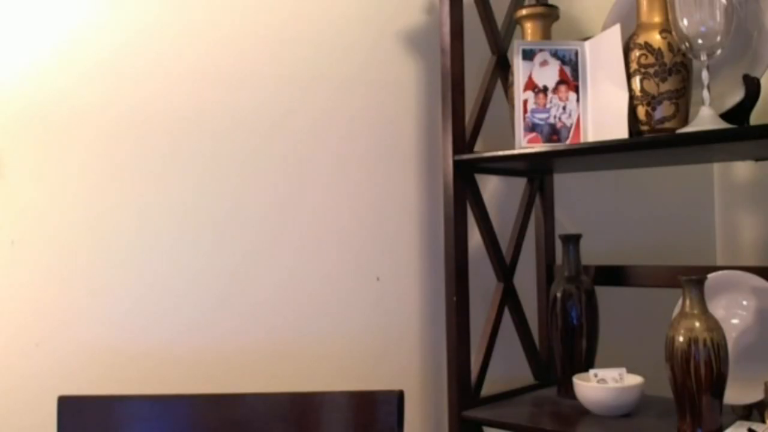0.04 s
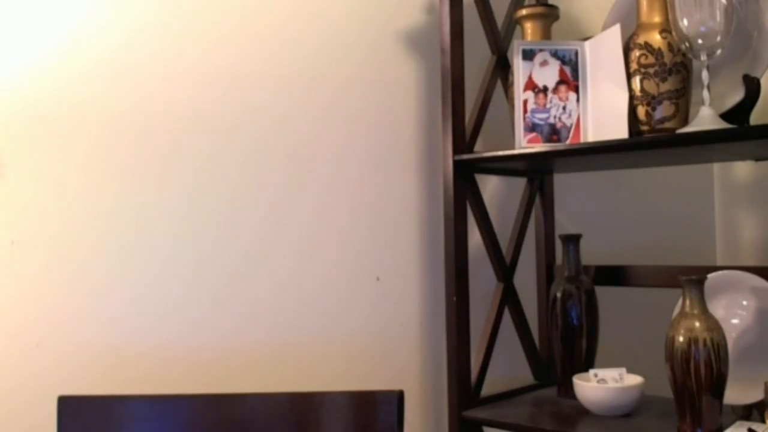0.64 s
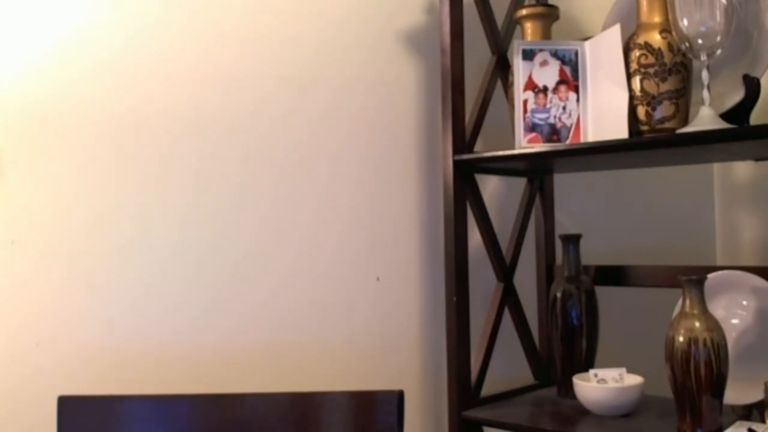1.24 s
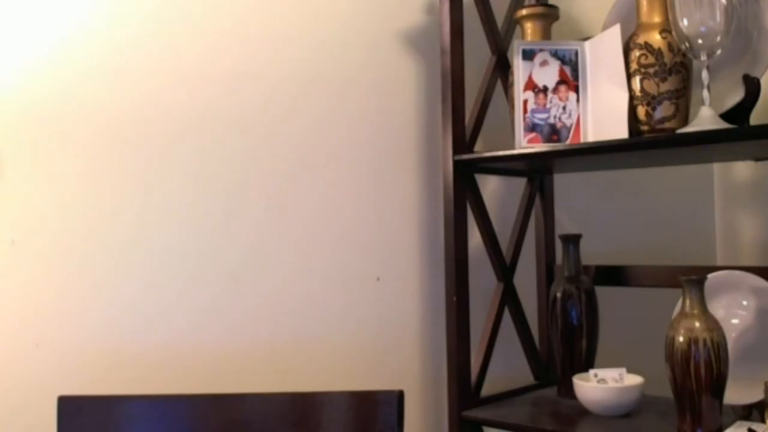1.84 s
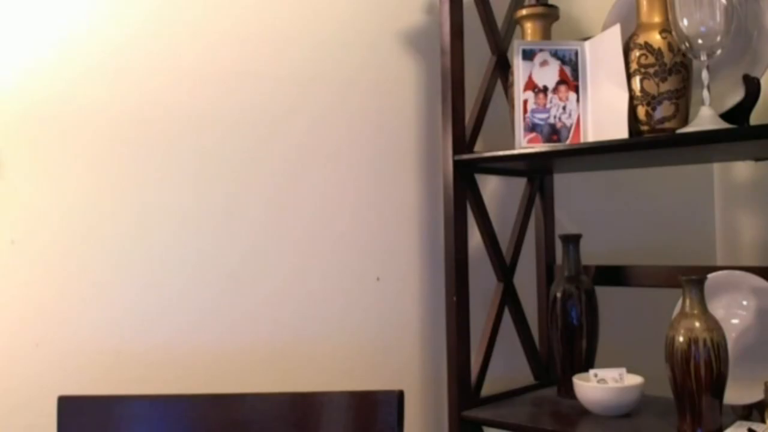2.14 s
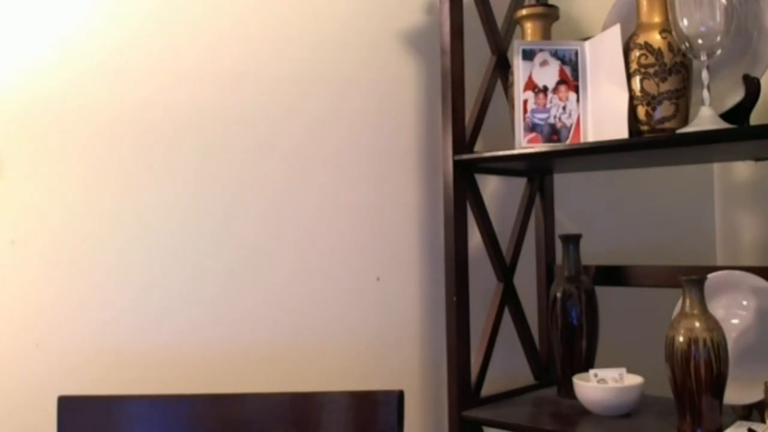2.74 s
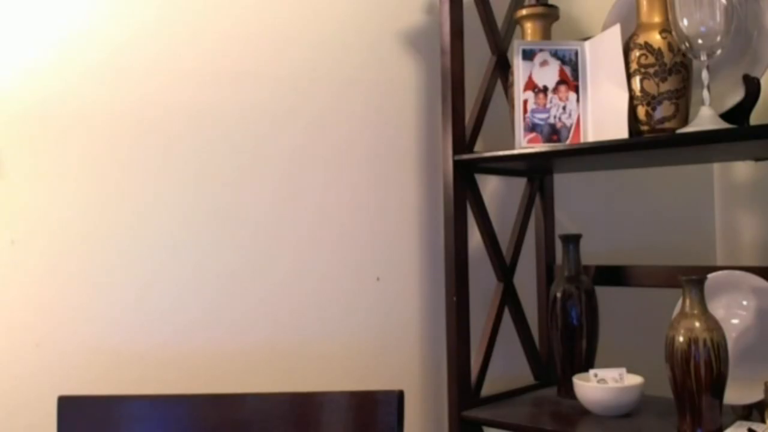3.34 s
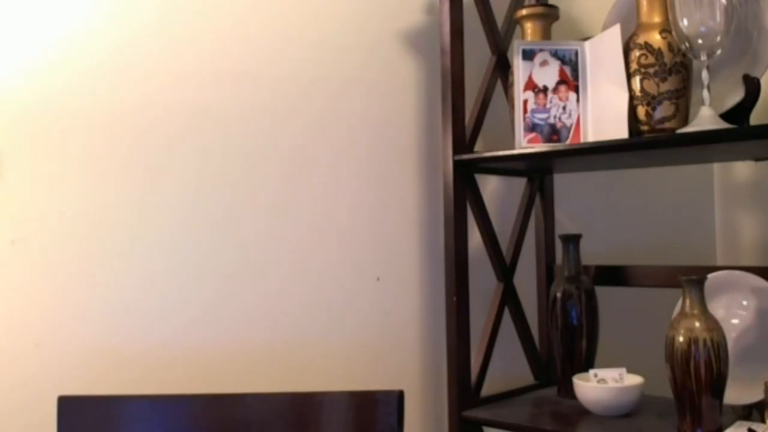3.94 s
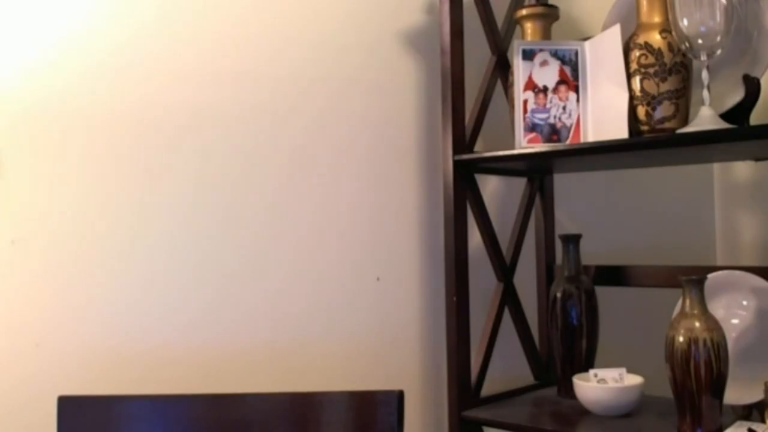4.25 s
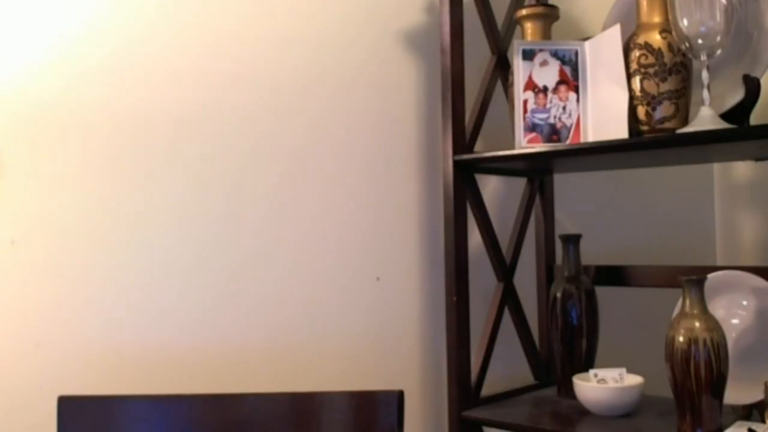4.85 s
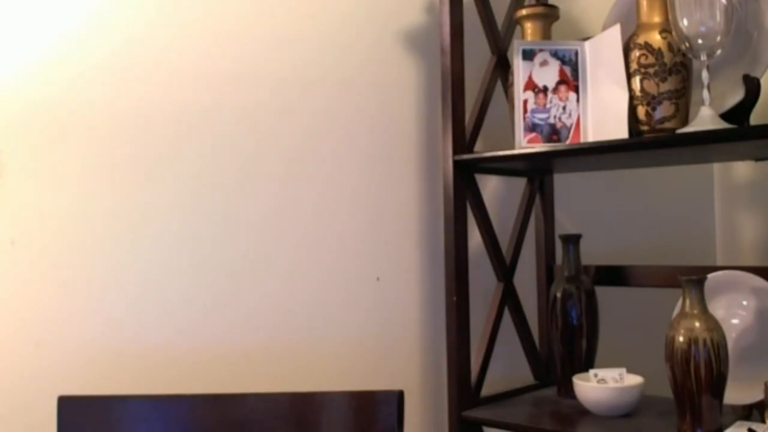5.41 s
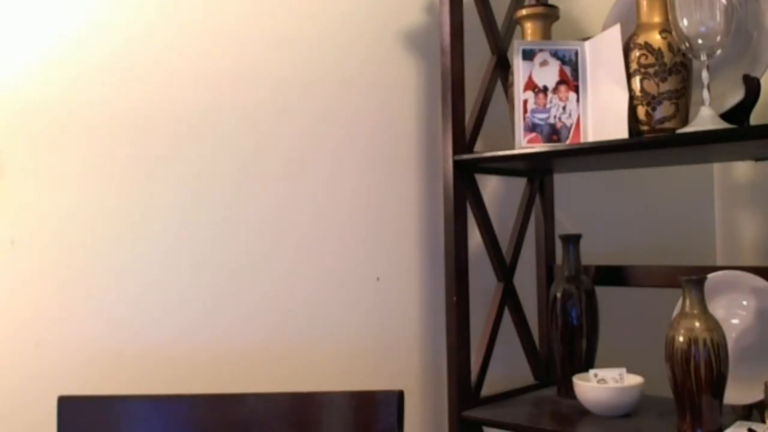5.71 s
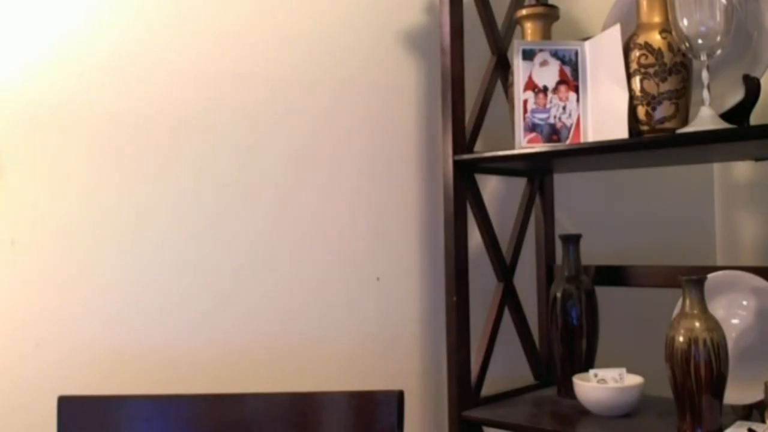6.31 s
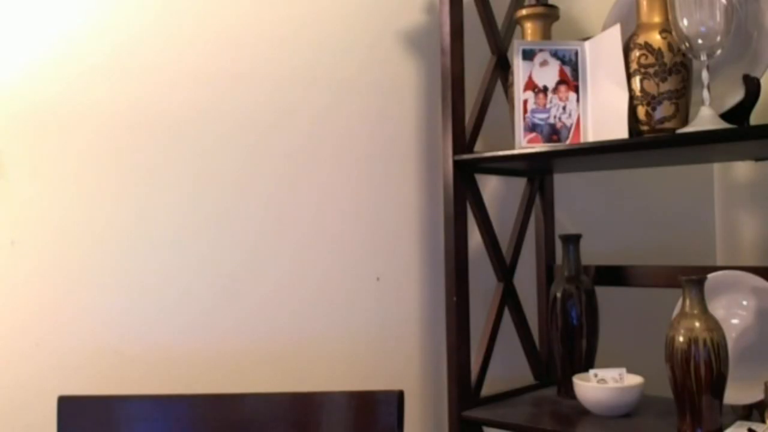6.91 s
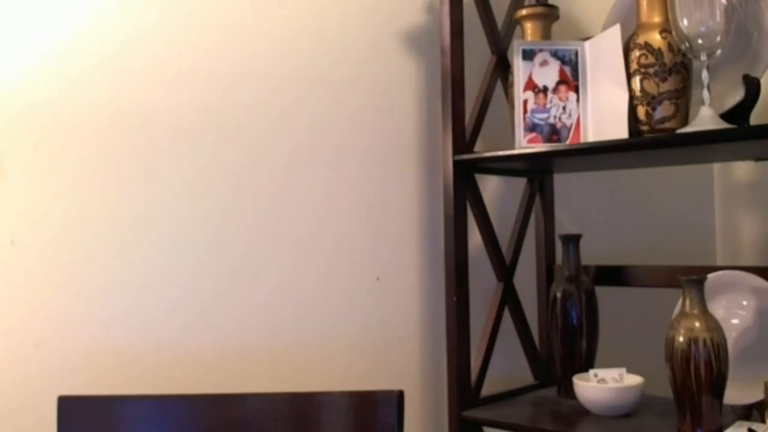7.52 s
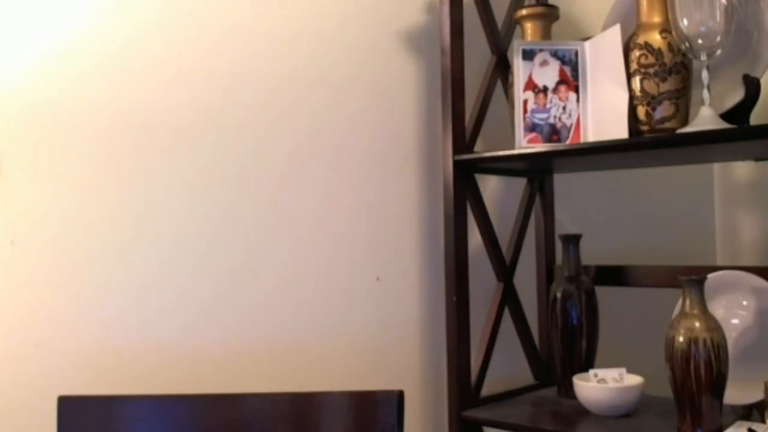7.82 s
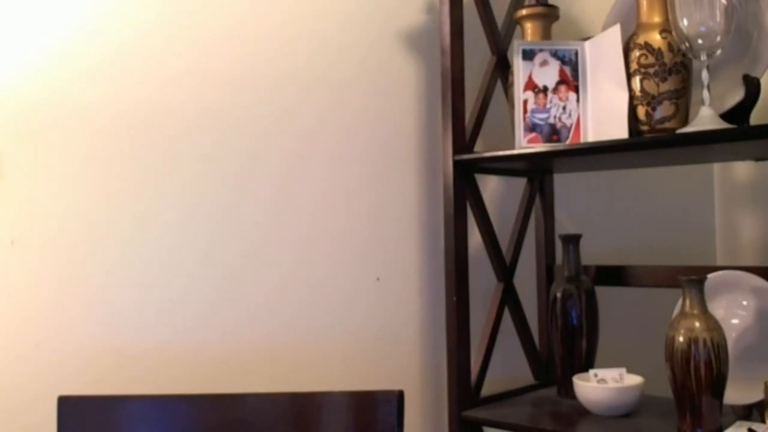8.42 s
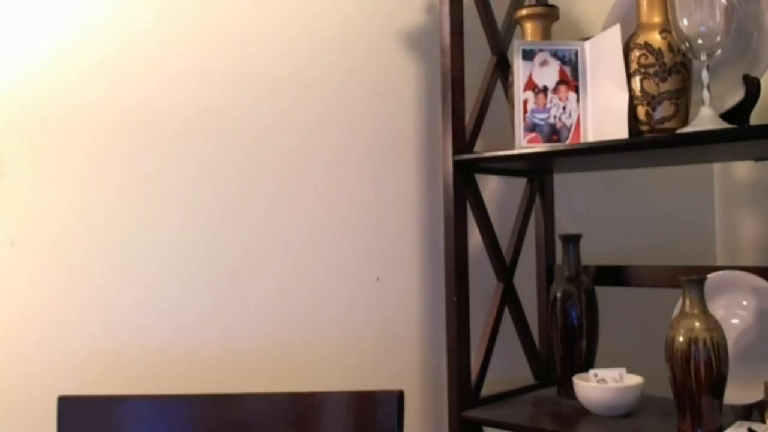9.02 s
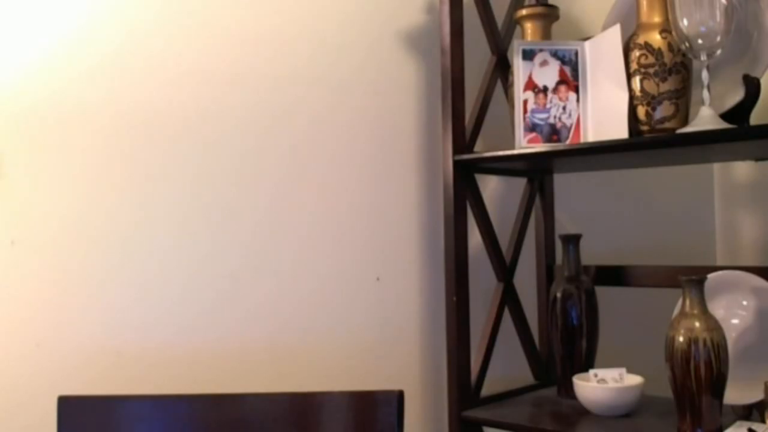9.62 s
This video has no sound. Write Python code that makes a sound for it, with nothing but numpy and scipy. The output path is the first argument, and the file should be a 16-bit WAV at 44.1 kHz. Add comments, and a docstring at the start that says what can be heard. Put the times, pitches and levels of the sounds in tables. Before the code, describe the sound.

Heard from a quiet room downstairs, someone walks across the floor above. The first steps are low, dull bumps; the middle ones land harder, with a boom and a wooden knock; the last ones are lighter again. Small creaks and ticks from the boards come between them. Soft room noise and a very faint electronic whine continue underneath, and the steps sit slightly to the right.

```python
"""Dull footsteps thud on the floor above a quiet room, grow heavy overhead, then walk off more lightly.
Each heel and toe blow is an impact that excites the damped modes of joists, ceiling panel and boards,
heard as a boom, a thud and a dull knock. Now and then a board creaks, squeaks, cracks or taps.
Beneath it lie soft room noise, coloured by standing waves, and the faint whine of the recorder."""
import sys
import numpy as np
from scipy import signal
from scipy.fft import rfft, irfft
from scipy.io import wavfile
from scipy.ndimage import uniform_filter1d, minimum_filter1d

SR = 44100
rng = np.random.default_rng(int(sys.argv[2]) if len(sys.argv) > 2 else 0)


def bounce(signal):
    """Save signal as a 16-bit WAV file at the path given by the first command-line argument."""
    frames = np.transpose(np.atleast_2d(signal))
    limited = np.clip(frames, -1, 1)
    pcm = np.round(limited * 32767).astype(np.int16)
    wavfile.write(sys.argv[1], SR, pcm)


N = 426006


def undb(db):
    """Amplitude ratio of a level in decibels."""
    return 10 ** (np.asarray(db) / 20)


def rms(x):
    """Root-mean-square amplitude."""
    return np.sqrt(np.mean(x ** 2)) + 1e-12


def bins():
    """Fourier frequencies of the whole scene in Hz, floored at 1."""
    return np.maximum(np.fft.rfftfreq(N, 1 / SR), 1)


def curve(points, hz):
    """Interpolation of (Hz, value) points on a log-frequency axis."""
    f, value = np.transpose(points)
    return np.interp(np.log(hz), np.log(f), value)


def noise(db):
    """Spectral shaping: white noise weighted by db in each bin, then scaled to unit rms."""
    x = irfft(rfft(rng.standard_normal(N)) * undb(db), N)
    return x / rms(x)


def add(out, start_s, x):
    """Superposition: x is summed into out from start_s on."""
    i = max(int(start_s * SR), 0)
    out[..., i:i + x.shape[-1]] += x[..., :max(N - i, 0)]


def spread(mid, side, balance):
    """Amplitude panning: mid and side become left and right, balanced frequency by frequency."""
    ratio = undb(curve(balance, bins()))
    spectra = np.array([ratio * rfft(mid + side), rfft(mid - side)])
    return irfft(spectra * 2 / (1 + ratio), N)


def footsteps(brush_lead_s=0.02485):
    """Impact excitation: each step is a light brush of the sole, the heel's blow, then the duller toe."""
    # Each row: heel time in seconds, thud level in dB, tilt in dB per octave (set by where the foot
    # lands), boom and knock levels in dB, ring time and toe delay in seconds, toe thud and boom in dB.
    steps = [(.388, -42.5, 7, -38, -61.5, 0.056, .07, -45, -50),
             (0.459, -34, -17, -40, -53, 0.092, 0.059, -36.5, -29.5),
             (0.653, -35, -28, -30, -55, 0.089, .078, -39, -32),
             (0.957, -22.5, -24, -19.5, -45.5, 0.077, .126, -38, -30),
             (1.362, -36, 11, -51, -51.5, 0.072, 0.11, -33.5, -60),
             (2.147, -20.5, -19.5, -26, -31.5, 0.089, .093, -36, -32),
             (2.533, -27, -19, -31, -35.5, 0.057, .06, -30.5, -34.5),
             (2.839, -33.5, 32, -53.5, -72, 0.018, 0.045, -57, -60),
             (2.95, -23, -4, -26.5, -31.5, 0.068, .1, -43, -37.5),
             (3.293, -19.5, 4.5, -19.5, -33.5, 0.07, 0.11, -36.5, -37.5),
             (3.601, -15, 14.5, -21, -20.5, .1, 0.037, -10.5, -45.5),
             (3.88, -20, -7.5, -25.5, -35, 0.094, 0.094, -36.5, -21.5),
             (4.067, -36, -23, -30.5, -61, 0.055, .05, -50, -49.5),
             (4.192, -18, 0, -34, -31, 0.065, .085, -23.5, -34.5),
             (4.548, -18.5, -3, -32, -37.5, 0.087, .082, -21, -33.5),
             (4.878, -25, -25, -30, -41, 0.072, 0.052, -36.5, -23),
             (5.301, -14.5, 3.5, -31, -33, 0.086, .078, -20, -25.5),
             (5.654, -18, -5.5, -32, -26, 0.053, .076, -28, -32.5),
             (6.163, -33, -1, -50, -40.5, 0.055, .046, -33, -28.5),
             (6.49, -33.5, -4, -37, -51, 0.045, .06, -28.5, -38.5),
             (6.927, -35.5, -12, -44.5, -74, 0.06, .083, -38, -59),
             (7.331, -27.5, -17, -35, -62, 0.061, 0.1, -45, -55),
             (7.859, -28, -20, -44, -40, 0.031, .068, -39, -34.5),
             (8.254, -28, 27, -57, -45, .035, 0.046, -45, -40),
             (8.506, -36, 26, -56, -51, .02, .05, -54, -58),
             (8.721, -33.5, 8.5, -49, -53, 0.055, .07, -48, -57),
             (9.108, -36.5, -7, -57, -54, .052, .055, -24, -33.5),
             (9.506, -28.5, -7, -29, -34.5, 0.053, 0.067, -29, -39.5)]
    # Each row: frequency in Hz, level of left over right in dB.
    balance = [(60, -8.5), (125, -8), (175, -10.5), (285, -10), (350, -5.5), (450, -1.5), (600, 1),
               (900, -3), (1200, -3)]
    out = np.zeros((2, N))
    for heel_s, thud_db, tilt_db, boom_db, knock_db, ring_s, toe_s, toe_thud_db, toe_boom_db in steps:
        brush = blow(thud_db=-45, tilt_db=tilt_db, boom_db=-49.5, knock_db=-56, ring_s=0.05)
        heel = blow(thud_db, tilt_db, boom_db, knock_db, ring_s)
        toe_knock_db = toe_thud_db + (knock_db - thud_db) - 6
        toe = blow(toe_thud_db, tilt_db - 6, toe_boom_db, toe_knock_db, 0.82 * ring_s)
        add(out, heel_s - brush_lead_s, brush)
        add(out, heel_s, heel)
        add(out, heel_s + toe_s, toe)
    return spread(*out, balance)


def blow(thud_db, tilt_db, boom_db, knock_db, ring_s, joist_top_hz=150, panel_top_hz=300):
    """Modal response to one impact: the joists boom, the panel thuds and the boards knock."""
    # Modes of joists, then panel, then boards. Each row: frequency in Hz, relative level in dB.
    ceiling_modes = [(28, -34.5), (50, -28), (67, -24.5), (90, -16), (108, -8.5), (124, 4), (141, -7.5),
                     (165, -0.5), (184, 0.5), (201, 1.5), (217, -1.5), (234, -1.5), (250, 1), (268, -9),
                     (287, -4.5), (312, -9), (335, -8), (372, -10), (425, -15), (447, -17.5), (490, -17.5),
                     (548, -20.5), (622, -24), (665, -35.5), (708, -28), (770, -21.5), (823, -33),
                     (890, -27), (961, -29), (1070, -34)]
    hz, db = np.transpose(ceiling_modes)
    joist, board = hz < joist_top_hz, hz > panel_top_hz
    panel = ~joist & ~board
    tilted = db + tilt_db * np.log2(hz / joist_top_hz)
    # A harder blow has a shorter contact: its cut-off rises an octave for every 22 dB.
    contact_hz = 680 * 2 ** ((thud_db + 15) / 22)
    softened = db - 10 * np.log10(1 + (hz / contact_hz) ** 10)
    boom = ring(hz[joist], db[joist], 1.004 * ring_s, side_db=-19, rise_s=0.02, detune=0.012)
    thud = ring(hz[panel], tilted[panel], ring_s, side_db=-14, rise_s=0.017, detune=0.0162)
    knock = ring(hz[board], softened[board], ring_s, side_db=-13.5, rise_s=0.019, detune=0.035)
    return undb(boom_db) * boom + undb(thud_db) * thud + undb(knock_db) * knock


def ring(hz, db, ring_s, side_db, rise_s, detune, tail_db=-36, tail_s=0.19, scatter_db=2):
    """Damped modes as mid and side; each spot on the floor drives them with its own strength and phase."""
    stride = 8  # low modes need only a low sample rate
    t = np.arange(0, SR / 2, stride) / SR
    pitch_draw, level_draw = rng.standard_normal((len(hz), 2)).T
    phase = rng.uniform(0, 2 * np.pi, (2, len(hz), 1))
    tuned_hz = hz * (1 + detune * pitch_draw)
    weight = undb(db + scatter_db * level_draw)
    # Vibration spreads through the floor, holds briefly and dies, the high modes first.
    life_s = ring_s * np.minimum(260 / hz[:, None], 1) ** 0.38
    rise = 1 - np.exp(-(t / rise_s) ** 2)
    decay = np.exp(-(t / life_s) ** 1.75) + undb(tail_db) * np.exp(-t / tail_s)
    envelope = rise * decay
    sound = weight @ (envelope * np.sin(2 * np.pi * tuned_hz[:, None] * t + phase))
    # A blow carries the same energy however its modes beat.
    energy = np.average(np.mean(envelope ** 2, axis=1), weights=weight ** 2)
    sound *= np.sqrt(energy) / rms(sound[0])
    sound[1] *= undb(side_db)
    return signal.resample_poly(sound, stride, 1, axis=1, window="blackmanharris")


def suppress(x, threshold_db=-49, window_s=0.018):
    """Downward expansion: the recorder's noise suppressor swallows the thuds' faint starts and ends."""
    power = uniform_filter1d(x.mean(axis=0) ** 2, size=int(window_s * SR) | 1)
    power = np.maximum(uniform_filter1d(power, size=221), 0)
    return x * power / (power + undb(threshold_db) ** 2)


def board_noises(gap_s=0.007, jitter_s=0.000975, swell_s=0.02, ring_s=0.0028, echo_db=-15, echo_s=0.031):
    """Resonance: narrow-band noise bursts make the boards' creaks, squeaks, cracks, taps and knocks."""
    # Each row: start in seconds, level in dB, length in seconds, pitch in Hz, half-bandwidth in Hz.
    board_events = [(.01, -43, 0.041, 337, 74.6), (2.163, -49, 0.033, 566, 79.4),
                    (3.31, -49, 0.026, 557, 80.5), (3.613, -32, 0.013, 810, 228),
                    (3.666, -39, 0.028, 770, 186), (3.895, -44, 0.009, 662, 169),
                    (4.203, -52, 0.0065, 1180, 180), (4.558, -46.5, 0.027, 800, 159.7),
                    (4.564, -58, 0.011, 1250, 150), (5.325, -48.5, 0.062, 560, 81.2),
                    (6.953, -58.5, 0.016, 773, 69.4), (7.351, -55.5, 0.028, 2500, 330),
                    (7.807, -38.5, 0.029, 440, 100), (7.832, -59.5, 0.014, 2540, 260.8),
                    (8.284, -40.5, 0.031, 330, 65.14), (8.432, -51, 0.031, 281, 80.04),
                    (9.52, -45.5, 0.0051, 2440, 297.7), (9.524, -48.5, 0.041, 2250, 477.6)]
    size = 8192
    t, out = np.arange(size) / SR, np.zeros(N)
    decay = np.exp(-t / ring_s) + undb(echo_db) * np.exp(-t / echo_s)
    for start_s, db, length_s, hz, half_hz in board_events:
        resonance = signal.butter(5, [hz - half_hz, hz + half_hz], "bandpass", fs=SR, output="sos")
        excitation = np.zeros(N)
        for onset_s in np.arange(0, length_s, gap_s):
            late, strength = rng.standard_normal(2)
            swell = min((onset_s + gap_s) / swell_s, 1)  # the first bursts are weaker
            burst = swell * undb(0.85 * strength) * decay * rng.standard_normal(size)
            add(excitation, onset_s + jitter_s * late, burst)
        sound = signal.sosfilt(resonance, excitation[:size])
        add(out, start_s, undb(db) * np.sqrt(length_s * SR / size) * sound / rms(sound))
    return out


def room(level_db=-54.5, waver_db=2.5, bass_hz=400):
    """Room resonance: standing waves colour a soft air noise, whose bass wavers."""
    # The broadband noise. Each row: frequency in Hz, relative spectral density in dB.
    air_spectrum = [(25, -45), (42, -19.5), (80, -14), (120, -1), (170, -4), (260, -5), (360, -8.5),
                    (520, -11), (1150, -15), (1750, -22), (3500, -27.5), (5200, -29.5), (9500, -35.5),
                    (14000, -39.5)]
    # Each row: frequency in Hz, half-width in Hz, gain in dB.
    standing_waves = [(173, 9.4, 6.5), (234, 11.5, 7), (294.2, 4.3, 6.5), (503, 27, -1), (1250, 23, 2.5)]
    # Each row: frequency in Hz, level of side over mid in dB.
    stereo_width = [(100, -16), (280, -17.5), (600, -17), (1200, -19), (2300, -24.5), (3300, -11.5),
                    (4600, -16), (9000, -12.5), (13000, -8)]
    # Each row: frequency in Hz, level of left over right in dB.
    balance = [(60, -2.5), (270, -7.5), (370, -3), (550, -1), (1000, 2.5), (1900, 0.5), (2700, -0.7),
               (3500, -3.5), (5800, 3.5), (8000, -0.5)]
    f = bins()
    resonances_db = sum(db / (1 + ((f - hz) / half_hz) ** 2) for hz, half_hz, db in standing_waves)
    colour_db = curve(air_spectrum, f) + resonances_db
    mid = noise(colour_db)
    side = irfft(rfft(noise(colour_db)) * undb(curve(stereo_width, f)), N)
    bass = irfft(rfft(mid) / (1 + (f / bass_hz) ** 4), N)
    waver = noise(-40 * np.log10(1 + f / 8))  # mostly below 8 Hz
    mid += bass * (undb(waver_db * waver) - 1)
    return undb(level_db) * spread(mid, side, balance)


def whine(gain_db=-0.5, jitter_rad=0.85, jitter_hz=15):
    """Phase modulation: thin tones from the recorder's electronics wobble slightly together."""
    # Each row: frequency in Hz, rms level in dB before gain_db.
    tones = [(2998, -79.5), (4037, -88), (4996, -81.5), (6993, -86.5), (8000, -86), (8990, -85),
             (9986, -85.5), (10987, -87), (11983, -90), (12985, -100)]
    t = np.arange(N) / SR
    wobble = jitter_rad * noise(-40 * np.log10(1 + bins() / jitter_hz))
    out = np.zeros(N)
    for hz, db in tones:
        phase = 2 * np.pi * (hz * t + rng.random()) + wobble
        out += np.sqrt(2) * undb(db + gain_db) * np.sin(phase)
    return out


def scene():
    """Superposition of the steps and board noises from above and the noise of the quiet room."""
    return suppress(footsteps()) + board_noises() + room()


def record(dry, peak_limit=1.0, top_hz=13900):
    """Peak and band limiting: the recorder eases overloads down, adds its whine and cuts the top."""
    allowed = peak_limit / np.maximum(np.abs(dry).max(axis=0), peak_limit)
    gain = uniform_filter1d(minimum_filter1d(allowed, size=881), size=881)  # 20 ms windows
    lowpass = signal.ellip(10, 0.2, 80, top_hz, fs=SR, output="sos")
    return signal.sosfilt(lowpass, gain * dry + whine())


dry = scene()
out = record(dry)
bounce(out)
```